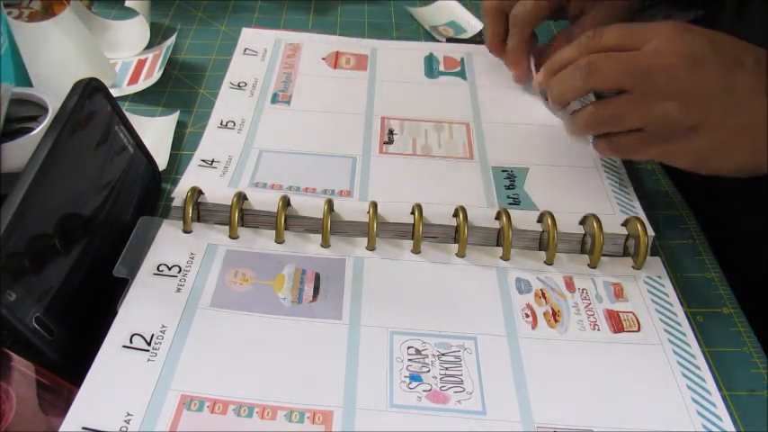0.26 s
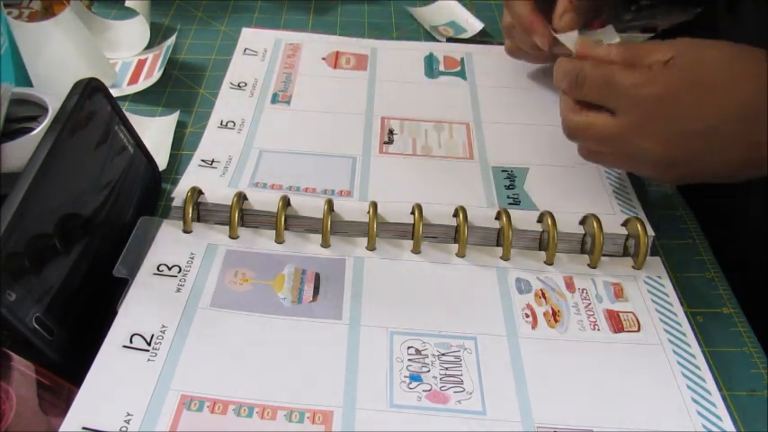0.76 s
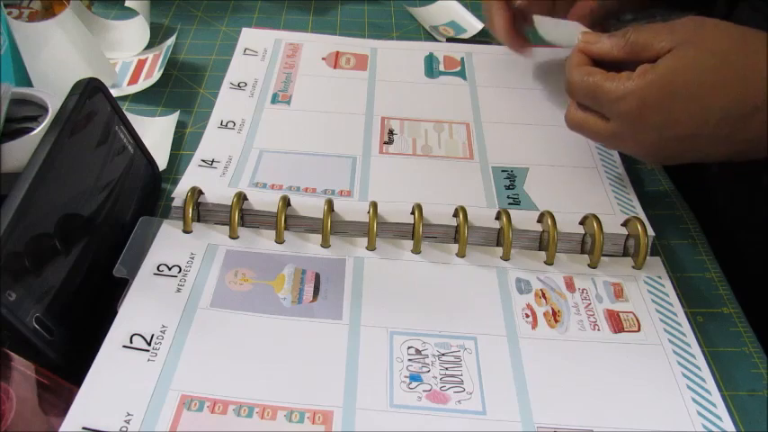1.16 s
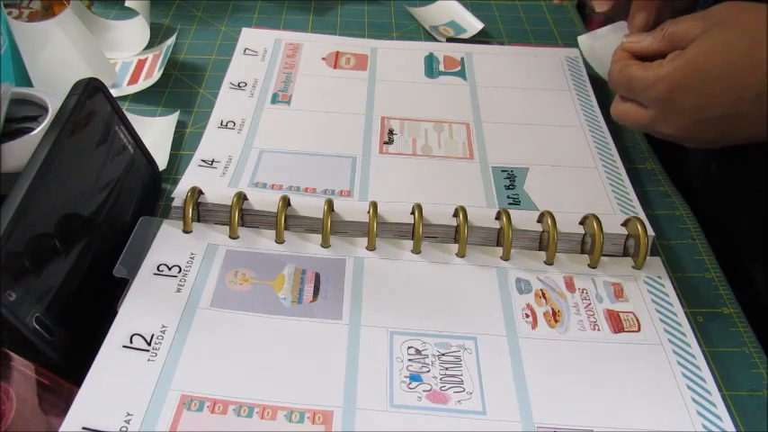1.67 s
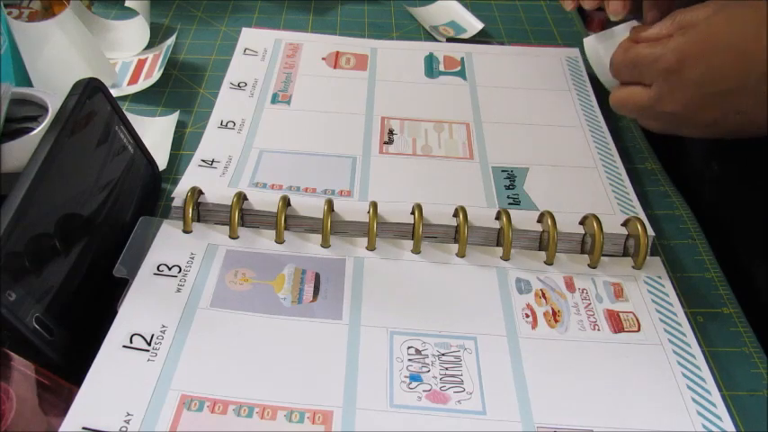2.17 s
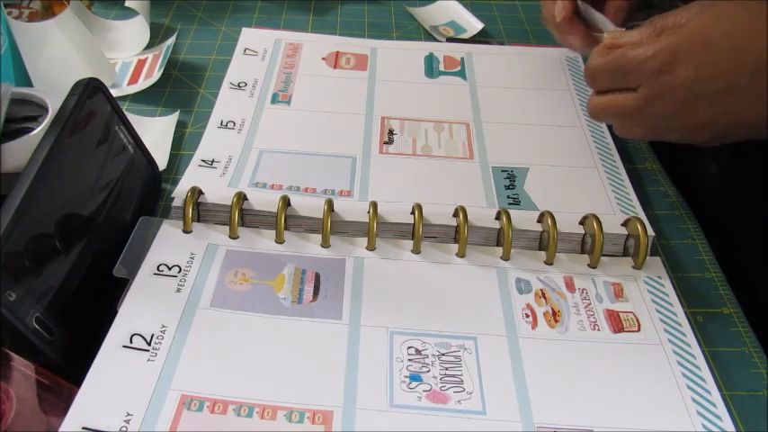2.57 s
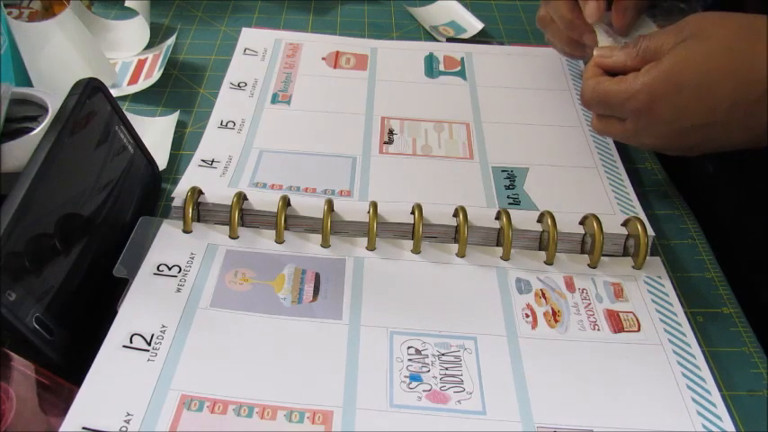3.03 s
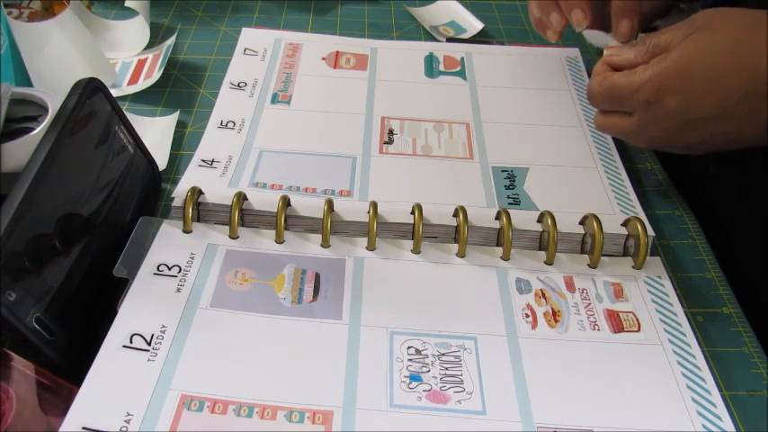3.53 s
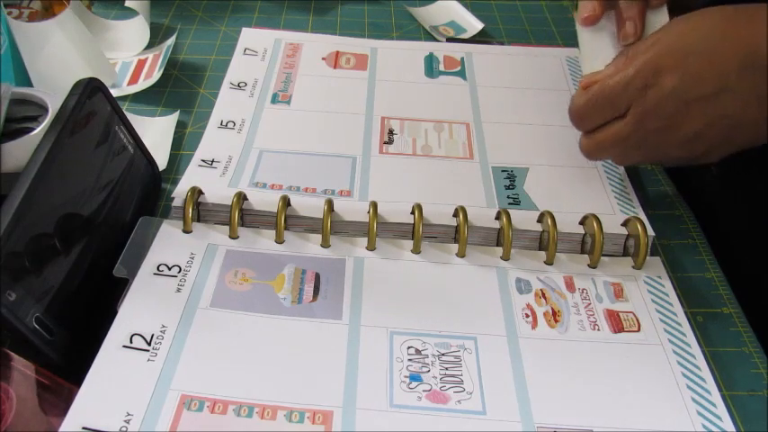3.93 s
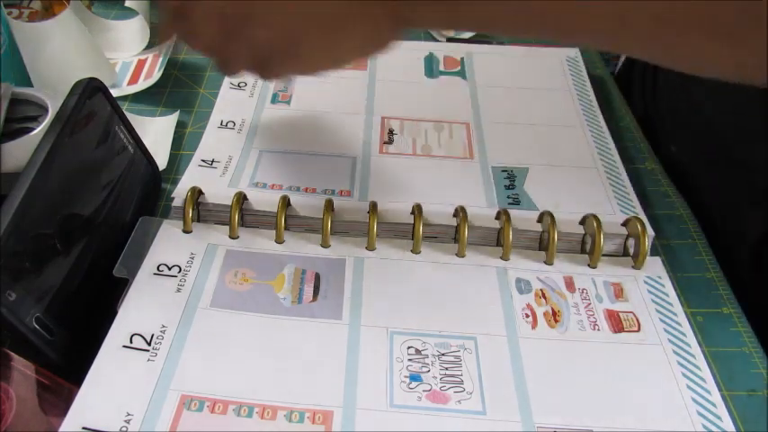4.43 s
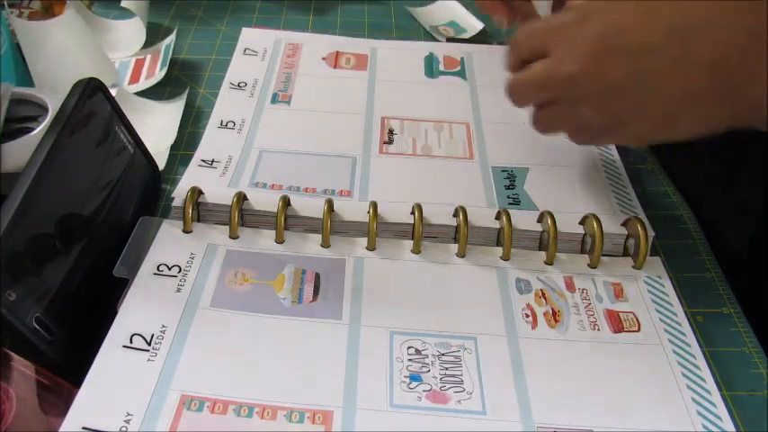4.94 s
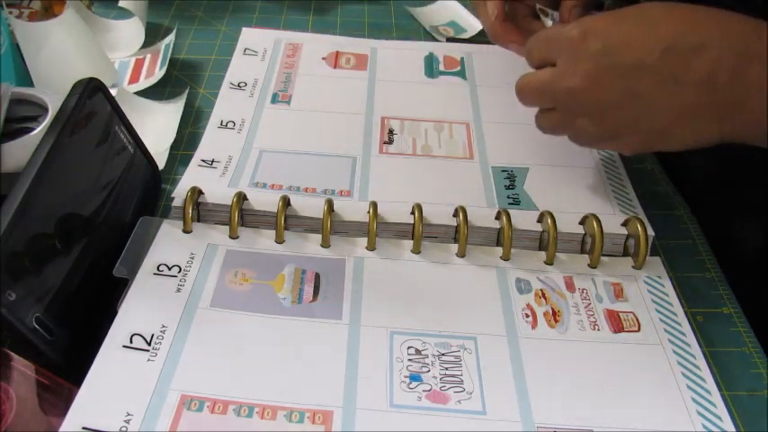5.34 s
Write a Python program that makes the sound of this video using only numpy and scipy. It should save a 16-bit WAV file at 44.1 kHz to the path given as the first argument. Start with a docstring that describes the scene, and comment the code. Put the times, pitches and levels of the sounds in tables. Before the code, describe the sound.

A quiet small room with a steady, slightly wavering low hum near 236 hertz, soft ventilation rumble and faint microphone noise. From 0 to 0.7 s fingers rub a paper sticker close by, with brief crisp scrapes, very faint thin squeaks and two soft dull bumps near 0.13 s. Small ticks of buckling paper follow at about 0.8-0.9 s, then sparse faint rubs until 1.7 s. It is nearly still until a clear snap at 2.4 s, with weak rubbing and a tiny tick after it. At 3.9 s a snap and light knock on the pages begin renewed rustling. A dull thump and loud, bright double snap hit at 4.2 s, the loudest moment, with a brief low drone swelling around 4.4 s. Crackles and scrapes continue to 5.0 s, with crisp ticks near 4.9 and 4.99 s. Gentle rubs return around 5.3-5.55 s with a last small tick. The room's echo is short.

```python
"""Small room, desk with a planner: hands pick a paper sticker off its backing, then reach across with the scrap.
Background: slightly wavering hum sines over ventilation rumble and widened microphone noise, both shaped noise.
Hands: a low drone of resonant noise as the arm reaches, and dull bumps of decaying sines.
Paper: grain and noise bursts rub, gliding sines squeak, enveloped noise snaps; the pages below ring in damped modes.
The paper passes through the room's echo; a camera close to the desk notches and band-limits everything."""
import sys
import numpy as np
from scipy import signal
from scipy.fft import rfft, irfft
from scipy.io import wavfile
from scipy.ndimage import uniform_filter1d

SR = 44100
rng = np.random.default_rng(int(sys.argv[2]) if len(sys.argv) > 2 else 0)


def to_wav(s):
    """Save 16-bit WAV."""
    ch = np.atleast_2d(s).T  # columns
    pcm = np.round(np.clip(ch, -1, 1) * 32767)  # PCM
    wavfile.write(sys.argv[1], SR, pcm.astype(np.int16))


N = 246959
TIME_S, BIN_HZ = np.arange(N) / SR, np.fft.rfftfreq(N, 1 / SR)
LEFT_RIGHT = np.array([[1], [-1]])

# ventilation noise shared by both channels, before the lean: (frequency [Hz], density [dB per Hz])
AIR_MID = [(20, -94), (45, -83.5), (60, -79), (80, -86.5), (125, -79), (180, -83.5), (300, -82),
           (450, -88.5), (800, -89.5), (1200, -99), (2000, -102), (3300, -108), (10000, -108),
           (15000, -112)]
# microphones' own noise, widened, opposed between the channels, before the lean:
# (frequency [Hz], density [dB per Hz])
MIC_NOISE_SIDE = [(20, -75), (50, -78), (105, -71.5), (200, -73.5), (300, -75.5), (500, -82), (850, -90.5),
                  (1200, -92), (2000, -104), (3300, -111), (8000, -109), (15000, -113)]
# faint, wavering tones: (frequency [Hz], rms level [dB], waver [dB])
FAINT_TONES = [(122.6, -78.5, 2.5), (517.5, -71.5, 4), (2530, -77.5, 3)]
# drone while the arm reaches: (time [s], rms level [dB])
REACH_LEVEL = [(3.9, -59), (4.05, -55.5), (4.3, -56), (4.39, -39.5), (4.44, -48.5), (4.62, -48),
               (4.8, -54.5), (4.96, -53.5), (5.15, -68)]
# drone resonances: (frequency [Hz], width [Hz], relative gain [dB])
REACH_MODES = [(208, 4.7, -9), (267, 93, 2.5), (307, 11, 1.5)]
# dull bumps of the hands: (time [s], frequency [Hz], peak level before the rise [dB], t60 [s])
BUMPS = [(.125, 442, -48, 0.37), (0.139, 344, -49.5, 0.17), (4.195, 111, -41.5, 0.11)]
# glue letting go in thin squeaks:
# (start [s], end [s], first frequency [Hz], last frequency [Hz], dry rms level [dB])
SQUEAKS = [(0, 0.003, 5100, 5010, -55), (0, 0.06, 5450, 5470, -67), (0.05, 0.108, 3750, 3720, -75),
           (.14, 0.306, 5040, 4650, -75), (0.185, 0.35, 6300, 6560, -66), (0, .15, 2216, 1720, -70.5)]
# finger strokes along the paper, before the friction trims:
# (start [s], length [s], crisp edge friction [dB], soft skin friction [dB])
STROKES = [ (-.02, 0.049, -55.5, -56.5), (0, 0.65, -76, -60.5), (0.24, .11, -52.5, -56),
           (0.309, 0.075, -50.5, -63.5), (0.373, 0.11, -51.5, -62), (.62, .1, -65, -65),
           (0.874, 0.36, -67.5, -66), (1.022, 0.037, -63, -60), (1.09, 0.056, -63.5, -82),
           (1.157, .045, -59.5, -60.5), (1.295, 0.22, -64, -65.5), (1.5, .19, -68, -61),
           (2.408, 0.065, -61, -66), (2.528, 0.25, -66, -67), (3.026, .24, -67, -71),
           (3.353, 0.14, -65, -71), (3.744, 0.1, -57.5, -60), (3.8, 0.65, -58, -60),
           (4.089, .13, -55.5, -52.5), (4.189, 0.027, -47.5, -44), (4.201, 0.031, -35, -47),
           (4.226, 0.27, -54, -58), (4.511, 0.063, -54.5, -61), (4.595, .07, -52, -56),
           (4.659, 0.14, -50.5, -59), (4.797, 0.32, -60.5, -60), (5.301, 0.059, -57.5, -64),
           (5.353, 0.14, -58.5, -67), (5.472, 0.11, -56.5, -62.5)]
# edge friction spectrum: (frequency [Hz], relative density [dB])
EDGE_SPECTRUM = [(500, -3), (1800, -24), (3200, -2.5), (3900, -4.5), (4700, -1), (5700, -5), (7000, 0.5),
                 (8800, 1.5), (12000, -0.5), (15000, -8)]
# skin friction spectrum: (frequency [Hz], relative density [dB])
SKIN_SPECTRUM = [(150, -8.5), (450, 6), (800, -10.5), (1300, 5.5), (2300, 1), (3200, -8), (6000, -9),
                 (15000, -58)]
# modes of the pages on the desk: (frequency [Hz], relative level [dB], t60 [s])
PAGE_MODES = [(480, -18, .03), (1005, -5, .028), (1130, -1, .04), (1295, -1, .03), (1510, -6, .02),
              (1950, -5, .02), (2320, 2, .035), (2540, -4, .03), (2635, -3, .03), (3140, -7, .025)]
# hand and stiff backing knocking on the pages: (time [s], dry rms level over 4 ms [dB])
KNOCKS = [(3.9057, -37), (4.0867, -44.5), (4.163, -44), (4.1965, -30.5), (4.2145, -28.5)]
# buckling paper: (time [s], dry rms level over 4 ms [dB], rise time [s], bent-sheet resonance [Hz],
# resonance height [dB], tilt [dB per octave])
SNAPS = [ (0.671, -56, .002, 6000, 3, -5), (0.7825, -44, 0.0011, 2100, 16, 0),
         (.8413, -45.5, 0.00028, 2300, 17, -2.5), (0.9122, -44.5, 0.0019, 11200, 8, -6.5),
         (2.407, -35, 0.00073, 4500, 6, 0.5), (2.7, -55, 0.00043, 9000, 4, -4),
         (3.9057, -33, 0.00094, 2500, 4.5, -6.5), (4.0864, -42, 0.0011, 2660, 10, -7.5),
         (4.1946, -34, 0.00076, 1280, 9, -8), (4.2134, -21.5, .00055, 2280, 12.5, -1.5),
         (4.2154, -20, 0.00086, 5640, 10.5, 3), (4.345, -43.5, .0013, 3280, 3, -3.5),
         (4.3713, -29.5, 0.00021, 7760, 7, 1.5), (4.389, -45.5, 0.002, 7500, 2, -13),
         (4.4897, -35, 0.00049, 4300, 6, 0.5), (4.513, -43, 0.0014, 3500, 2, -4),
         (4.5958, -49, .0005, 10000, -4, 5), (4.612, -40.5, 0.0017, 5000, 6, -4),
         (4.6893, -40, .0013, 6200, 8, -5), (4.754, -54.5, 0.00045, 11600, 13, -10),
         (4.89, -35.5, 0.00067, 2400, 19.5, 1.5), (4.9004, -33.5, 0.00094, 2470, 3, -4),
         (4.9873, -36.5, 0.00078, 11200, 9, -1.5), (4.9906, -38.5, .0003, 8000, 8, 5),
         (5.5625, -47.5, 0.00043, 1390, 21, -0.5)]
# snap spectrum before sheet resonance and tilt: (frequency [Hz], relative gain [dB])
PAPER_SPECTRUM = [(150, -32), (600, -12), (1200, -5), (2400, -0.5), (3200, -1), (4700, -0.5), (8500, 4.5),
                  (11000, 3.5), (13000, -6.5), (15500, -2.5)]
# left-right likeness of the room's echo: (frequency [Hz], likeness [-1..1])
ROOM_LIKENESS = [(300, 0.079), (1100, 0.99), (2400, 0.95), (3500, 1), (5000, 0.9), (8000, 0.35),
                 (13000, -.1)]
# room decay: (frequency [Hz], t60 [s])
ROOM_T60 = [(200, 0.78), (1100, 0.14), (3000, 0.18), (8000, 0.24), (15000, 0.092)]

STROKE_ATTACK, STROKE_RELEASE = 0.18, 0.26  # shares of a stroke spent speeding up and slowing down
STROKE_SAG_DB = -0.5  # the pressure eases over a stroke
HOLD_EDGE_DB, HOLD_SKIN_DB = -81.5, -70  # fingers merely holding the sheet, before the trims
KNOCK_RISE_S = 0.0022
SNAP_KNOCK_DB = -20  # page ring relative to the snap
CUTOFF_HZ = 15200


def amp(db):
    """Decibels to gain."""
    return 10 ** (np.asarray(db) / 20)


def unit(x):
    """Scales to rms 1."""
    return x / np.sqrt(np.mean(x ** 2) + 1e-30)


def read(points, hz):
    """Interpolates a table on a log-frequency axis."""
    point_hz, value = np.transpose(points)
    return np.interp(np.log(hz + 1), np.log(point_hz + 1), value)


def add(mix, start_s, sound):
    """Mixes a sound in at start_s."""
    part = mix[max(0, round(start_s * SR)):][:len(sound)]
    part += sound[:len(part)]


def colour(x, spectrum):
    """Filters a full-length signal by a spectrum, to rms 1."""
    return unit(irfft(rfft(x) * amp(read(spectrum, BIN_HZ)), N))


def drift(top_hz):
    """Low-passed noise, rms 1."""
    lowpass = 1 / (1 + (BIN_HZ / top_hz) ** 4)
    return unit(irfft(rfft(rng.standard_normal(N)) * lowpass, N))


def causal(db):
    """Minimum-phase impulse response with the given gain."""
    log_gain = np.log(amp(np.r_[db, db[-2:0:-1]]))
    return irfft(np.exp(signal.hilbert(log_gain).conj())[:len(db)])


def pair(a, b, likeness):
    """Left and right spectra of given likeness from two unrelated ones."""
    same = np.clip(likeness, -1, 1)
    return np.array([a, same * a + np.sqrt(1 - same ** 2) * b])


def air(left_db=0.76):
    """Ventilation rumble in the middle, widened microphone noise at the sides; lows lean a little left."""
    a, b = rfft(rng.standard_normal((2, N))) * np.sqrt(SR / 2)  # 0 dB per Hz
    mid = a * amp(read(AIR_MID, BIN_HZ))
    side = b * amp(read(MIC_NOISE_SIDE, BIN_HZ))
    lean = amp(LEFT_RIGHT * left_db / (1 + BIN_HZ / 500))
    return irfft(np.array([mid + side, mid - side]) * lean, N)


def hum(main_db=-47.0, waver_db=.5, wander_rad=0.052):
    """Appliance hum: one strong wavering tone, louder on the left, and a few faint, unsteady ones."""
    main_hz, lead_rad, balance_db = 235.97, -.48, 1.7
    phase = 2 * np.pi * main_hz * TIME_S + wander_rad * drift(5) + LEFT_RIGHT * lead_rad / 2
    out = np.sin(phase) * amp(main_db + waver_db * drift(7.9) + LEFT_RIGHT * balance_db)
    for hz, db, tone_waver_db in FAINT_TONES:
        tone = np.sin(2 * np.pi * hz * TIME_S + drift(9.7))
        out = out + tone * amp(db + tone_waver_db * drift(20.0))
    return np.sqrt(2) * out  # sine peak to rms


def reach():
    """Noise in a few low resonances swells and fades as the arm reaches."""
    body = sum(amp(db) / (1 + (2 * (BIN_HZ - hz) / width_hz) ** 2) for hz, width_hz, db in REACH_MODES)
    drone = unit(irfft(rfft(rng.standard_normal(N)) * body, N))
    return drone * amp(np.interp(TIME_S, *np.transpose(REACH_LEVEL), left=-100, right=-100))


def bumps(rise_s=0.0013, size=20000):
    """Soft flesh sets one low resonance going, without a click."""
    out, t = np.zeros(N), np.arange(size) / SR
    for start_s, hz, db, t60_s in BUMPS:
        ring = np.sin(2 * np.pi * hz * t) * amp(db - 60 * t / t60_s)
        add(out, start_s, ring * (1 - np.exp(-t / rise_s)))
    return out


def squeaks(jitter=.022):
    """Fast stick and slip gives faint, unsteady gliding whistles."""
    out = np.zeros(N)
    for start_s, end_s, first_hz, last_hz, db in SQUEAKS:
        n = max(8, round((end_s - start_s) * SR))
        hz = np.linspace(first_hz, last_hz, n) * (1 + jitter * drift(500)[:n])
        tone = np.sin(2 * np.pi * np.cumsum(hz) / SR) * amp(3.3 * drift(120)[:n])
        add(out, start_s, amp(db) * unit(tone * signal.windows.tukey(n, .5)))
    return out


def friction():
    """Edge and skin friction gains: every stroke speeds up, eases and slows to a stop."""
    power = amp([[HOLD_EDGE_DB], [HOLD_SKIN_DB]]) ** 2 * np.ones(N)
    for start_s, length_s, edge_db, skin_db in STROKES:
        now = (TIME_S >= start_s) & (TIME_S < start_s + length_s)
        u = (TIME_S[now] - start_s) / length_s
        speed = np.minimum(1, np.minimum(u / STROKE_ATTACK, (1 - u) / STROKE_RELEASE))
        stroke = amp([[edge_db], [skin_db]]) * speed * amp(STROKE_SAG_DB * u)
        power[:, now] += stroke ** 2
    return np.sqrt(power)


def flex(x, patchy_db=2.5):
    """The moving sheet bends, so its colour shifts in patches about 30 ms long and 700 Hz wide."""
    z = signal.stft(x, SR, nperseg=256)[2]
    patches = uniform_filter1d(rng.standard_normal(z.shape), size=4, axis=0)
    patches = unit(uniform_filter1d(patches, size=10, axis=1))
    return unit(signal.istft(z * amp(patchy_db * patches), SR, nperseg=256)[1][:N])


def rubbing(grains_per_s=1500, spread_db=-1.0, smooth=1.0, flutter_db=0.5, clump_db=3, edge_trim_db=-1,
            skin_trim_db=-1):
    """Paper edges catch in clumps of tiny grains; skin slides with a softer, lower hush."""
    edge, skin = friction()
    sizes = amp(spread_db * np.minimum(rng.exponential(1, N), 4)) * rng.choice([-1, 1], N)
    caught = rng.random(N) < grains_per_s / SR
    grains = unit(sizes * caught * amp(clump_db * drift(114)))
    crisp = flex(colour(grains + smooth * rng.standard_normal(N), EDGE_SPECTRUM))
    soft = colour(.5 * grains + rng.standard_normal(N), SKIN_SPECTRUM)
    rub = crisp * edge * amp(edge_trim_db) + soft * skin * amp(skin_trim_db)
    return rub * amp(flutter_db * drift(23))


def pages(rise_s, size=4096):
    """The pages ring on the desk after a blow, in damped modes of alternating sign; energy 1."""
    t, ring = np.arange(size) / SR, 0
    for k, (hz, db, t60_s) in enumerate(PAGE_MODES):
        ring = ring + (-1) ** k * amp(db - 60 * t / t60_s) * np.sin(2 * np.pi * hz * t)
    ring *= 1 - np.exp(-t / rise_s)
    return ring / np.linalg.norm(ring)


def snaps(after_db=-14, after_factor=9.9, size=4096):
    """A buckle is a tick and a swarm of fibre slips, coloured by the bent sheet; snaps and knocks ring the pages."""
    out, t, hz = np.zeros(N), np.arange(size) / SR, np.fft.rfftfreq(size, 1 / SR)
    level_window, width_share, tick = .004 * SR, .13, .3  # window in samples
    for start_s, db, rise_s, sheet_hz, sheet_db, tilt_db in SNAPS:
        swarm = t / rise_s * np.exp(1 - t / rise_s)
        swarm += amp(after_db) * np.exp(-t / (after_factor * rise_s))
        slips = np.tanh(rng.standard_normal(size)) * swarm
        slips /= np.linalg.norm(slips)
        slips[round(rise_s * SR / 2)] += tick
        sheet = sheet_db / (1 + ((hz - sheet_hz) / (width_share * sheet_hz)) ** 2)
        shape_db = read(PAPER_SPECTRUM, hz) + sheet + tilt_db * np.log2((hz + 800) / 5000)
        snap = signal.fftconvolve(slips, causal(shape_db))[:size]
        snap /= np.linalg.norm(snap)
        add(out, start_s, amp(db) * (snap + amp(SNAP_KNOCK_DB) * pages(rise_s)))
    for start_s, db in KNOCKS:
        add(out, start_s, amp(db) * pages(KNOCK_RISE_S))
    return np.sqrt(level_window) * out  # energy 1 to rms 1 over the window


def room(x, wet_db=-11.0, early_db=-10, early_s=0.0097, echo_s=0.0059, echo_db=-13, size=22050):
    """Scatter from things on the desk, one clear bounce and the short tail of a small room."""
    noise = rng.standard_normal((2, size))
    hz, t, z = signal.stft(noise, SR, nperseg=256)
    z = pair(z[0], z[1], read(ROOM_LIKENESS, hz)[:, None])
    decay = amp(-60 * t / read(ROOM_T60, hz)[:, None])
    tail = signal.istft(z * decay, SR, nperseg=256)[1][:, :size]
    t = np.arange(size) / SR
    early = tail * np.exp(-t / early_s) * (1 - np.exp(-t / 0.00069))
    late = tail * (1 - np.exp(-(t / 0.0081) ** 2))
    response = amp(early_db) * early / np.linalg.norm(early[0])
    response += amp(wet_db) * late / np.linalg.norm(late[0])
    response[:, 0] += 1  # direct sound
    response[:, round(echo_s * SR)] += amp(echo_db)
    return signal.fftconvolve(x[None], response, axes=1)[:, :N]


def ports(x, left_db=1.0, treble_hz=9000):
    """Short waves bend around the camera body, so treble reaches its two microphones differently."""
    scatter_rad, path_s = .55, .0006
    treble = 1 / (1 + (treble_hz / (BIN_HZ + 1)) ** 4)
    ripple = np.sqrt(2) * np.sin(2 * np.pi * (BIN_HZ * path_s + rng.random()))
    side = LEFT_RIGHT * treble
    return irfft(rfft(x) * amp(side * left_db) * np.exp(1j * side * scatter_rad * ripple), N)


def scene():
    """Paper in the room, over hands, hum, ventilation and microphone noise."""
    paper = ports(room(snaps() + rubbing() + squeaks()))
    return air() + hum() + reach() + bumps() + paper


def record(dry, notch_hz=680, notch_width_hz=170, depth=0.77):
    """The camera has a partial narrow notch in the low mids and a steep band limit."""
    notched = signal.lfilter(*signal.iirnotch(notch_hz, notch_hz / notch_width_hz, SR), dry)
    lowpass = signal.firwin(301, CUTOFF_HZ, window=("kaiser", 8), fs=SR)
    return signal.oaconvolve(dry + depth * (notched - dry), lowpass[None], "same")


dry = scene()
out = record(dry)
to_wav(out)
```